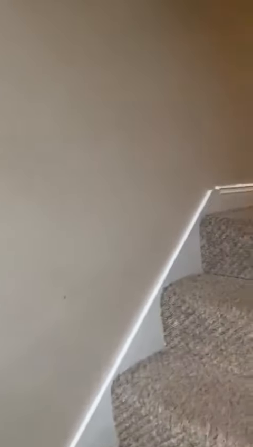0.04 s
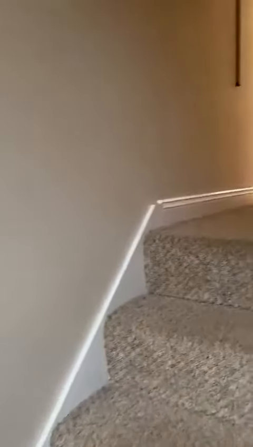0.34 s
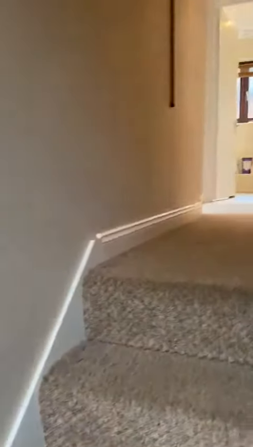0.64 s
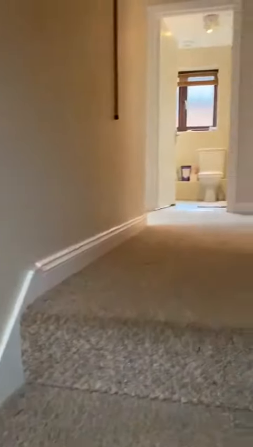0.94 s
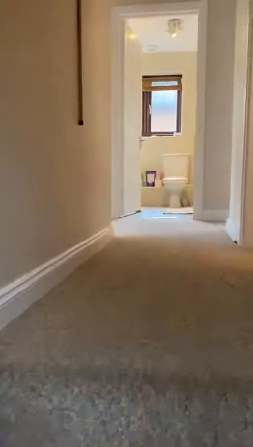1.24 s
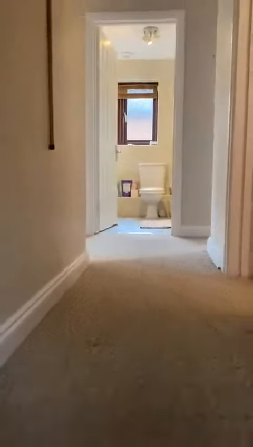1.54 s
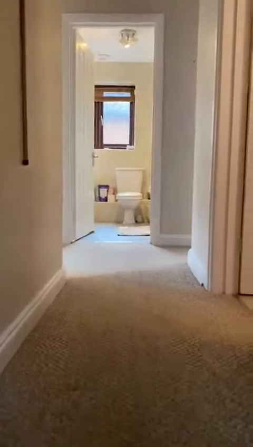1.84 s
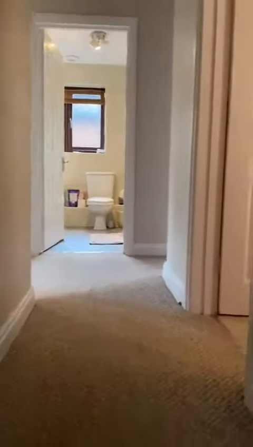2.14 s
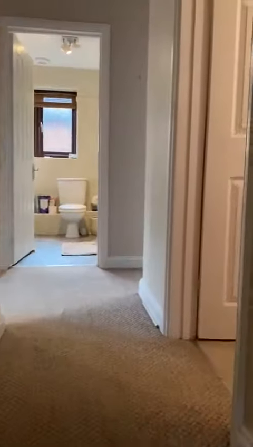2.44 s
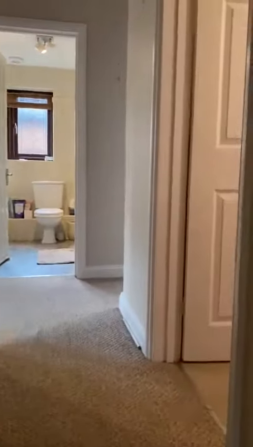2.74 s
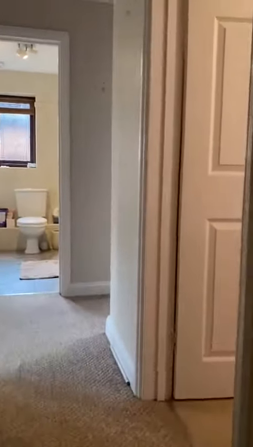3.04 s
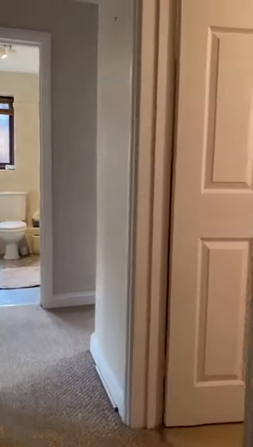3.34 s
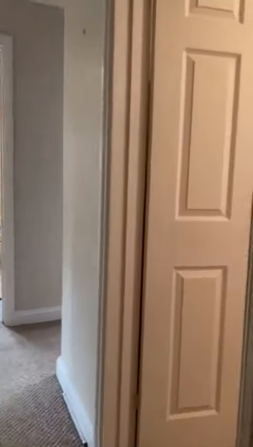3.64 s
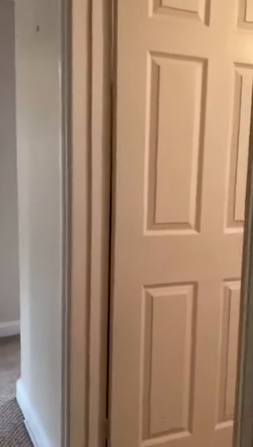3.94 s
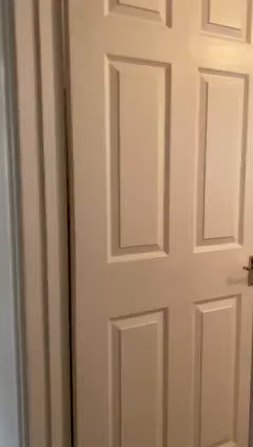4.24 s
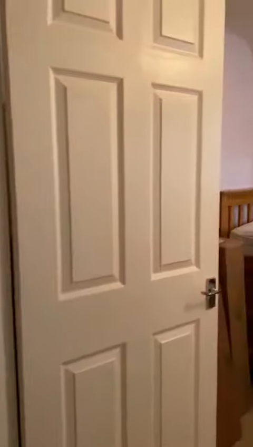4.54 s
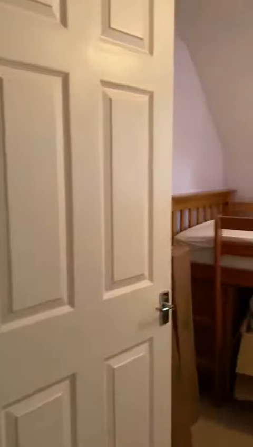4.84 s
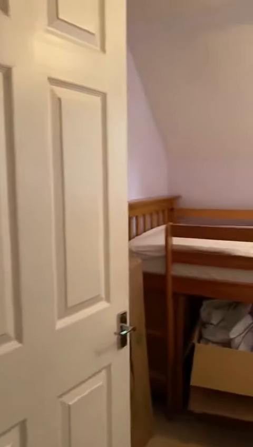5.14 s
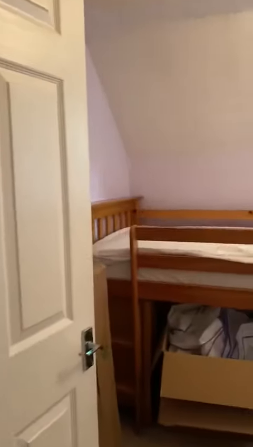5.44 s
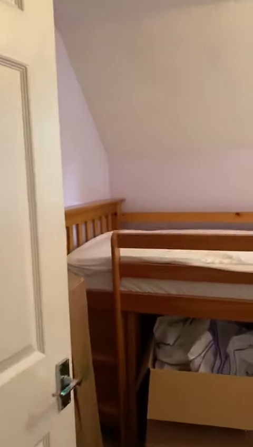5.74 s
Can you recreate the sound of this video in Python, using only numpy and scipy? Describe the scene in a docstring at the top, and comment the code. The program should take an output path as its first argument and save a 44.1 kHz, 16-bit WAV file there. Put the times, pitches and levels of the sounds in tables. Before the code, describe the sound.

Footsteps climb the last carpeted stairs and cross a landing in a quiet house. The steps land as deep, soft thuds, with floorboards knocking and clicking, and one loud wooden clack comes late on. Feet scuff the carpet and clothes brush faintly. Behind them a low electric hum swells and fades, all heard from a phone in the walker's hand.

```python
"""Footsteps climb the last carpeted stairs and cross a landing in a quiet house.
Each step thuds in the beams under the floor and boards knock, among sharp clicks and one loud clack.
Feet scuff the carpet and clothes brush, all heard from a phone in the walker's hand.
Behind them an electric hum swells and fades as the walker passes its loud and quiet spots."""
import sys
import numpy as np
from scipy import signal
from scipy.fft import rfft, irfft, next_fast_len
from scipy.io import wavfile
from scipy.ndimage import uniform_filter1d, map_coordinates

SR = 44100
rng = np.random.default_rng(int(sys.argv[2]) if len(sys.argv) > 2 else 0)


def master(y):
    """Save y as 16-bit WAV."""
    cut = np.clip(np.atleast_2d(y).T, -1, 1)
    pcm = np.round(cut * 32767)  # scale
    wavfile.write(sys.argv[1], SR, pcm.astype(np.int16))


N = 260631


def thuds():
    """Each footfall sets the beams under the floor swinging for a few cycles."""
    # Each row: start in seconds, level in dB, fade time in seconds (the time to drop by 60 dB).
    footfalls = [(0.311, -29.5, 0.19), (0.44, -34, 0.16), (1.136, -34, 0.46), (1.98, -40.5, 0.14),
                 (2.698, -38.5, 0.28), (2.941, -39.5, 0.17), (3.384, -33, 0.65), (4.035, -32.5, 0.32),
                 (4.198, -36.5, 0.15), (5.212, -36, 0.18)]
    # The beams' deep notes. Each row: pitch in Hz, relative level in dB.
    beam_notes = [(44, -19.5), (57, 6.5), (68, 11), (86, -5.5)]
    out, t = np.zeros(N), np.arange(SR // 2) / SR
    for start, db, fade in footfalls:
        swing = np.zeros(len(t))
        for hz, note_db in beam_notes:
            strength = amp(note_db + rng.normal(0, 0.24))
            swing += strength * np.sin(2 * np.pi * hz * (1 + rng.normal(0, 0.039)) * t)
        shape = amp(-60 * t / fade) * (1 - np.exp(-t / 0.1))
        add(out, start, amp(db) * strike(swing * shape, over=0.0046))
    return out


def knocks():
    """A board hits its beam, chatters and rings at two notes, then settles with a duller blow."""
    # Each row: start in seconds, level in dB, treble limit of the chatter in Hz, main note in Hz,
    # second note in Hz, fade time of the notes in seconds.
    blows = [(0.052, -53, 263, 160, 256.5, .15), (0.4277, -45, 1620, 478, 643, 0.092),
             (.876, -56.5, 354, 301, 244, 0.055), (1.205, -51, 900, 485, 601, .06),
             (1.990, -45, 847, 500, 636, .075), (2.524, -45.5, 704, 386, 618, 0.067),
             (2.719, -54.5, 1420, 308, 239, 0.069), (2.878, -54, 1250, 429, 623, .06),
             (3.000, -58.5, 770, 635, 520, 0.036), (3.026, -58.5, 700, 478, 169, .05),
             (3.37, -56, 773, 604, 440, 0.045), (3.401, -44.5, 560, 230.4, 174, .07),
             (3.956, -45.5, 900, 524, 288, 0.054), (4.019, -48, 196, 152.5, 268, 0.053),
             (4.128, -51, 448, 299, 438, .05), (4.176, -54.5, 850, 776, 516, .05),
             (4.213, -44, 1410, 457, 560, 0.062), (4.221, -45, 439, 303, 190, 0.049),
             (5.192, -46.5, 1200, 408, 521, 0.081), (5.347, -56.5, 320, 284, 219, 0.075),
             (5.641, -54.5, 830, 646, 808, 0.074)]
    # Where the whole floor rings. Each row: pitch in Hz, width in Hz, relative level in dB.
    floor_rings = [(148.4, 53, -1), (278, 55, -1), (367, 130, -4.5), (450, 120, -1), (708, 210, -2.5),
                   (964, 940, -4), (1540, 1730, -7)]
    out, t = np.zeros(N), np.arange(SR // 3) / SR
    chatter_fade_s, settle_delay_s, settle_db, settle_pitch = 0.15, 0.024, -7, 0.4675

    def floor(f):
        return sum((-1) ** k * amp(db) * resonance(f, hz, width)
                   for k, (hz, width, db) in enumerate(floor_rings))

    def note(hz, fade):
        return np.sin(2 * np.pi * hz * t) * amp(-60 * t / fade) * (1 - np.exp(-t / 0.002))

    settles = [(start + settle_delay_s, db + settle_db, *(settle_pitch * np.array(pitches)), fade)
               for start, db, *pitches, fade in blows]
    for start, db, top_hz, main_hz, second_hz, fade in list(blows) + settles:
        force = rng.standard_normal(len(t)) * amp(-60 * t / chatter_fade_s)
        force[0] += 27  # the first hard contact
        chatter = unit(soften(filtered(force, floor), top_hz, order=3))
        notes = unit(note(main_hz, fade) + amp(-4) * note(second_hz, fade))
        add(out, start, amp(db) * strike(chatter + amp(-0.5) * notes, over=0.013))
    return out


def clicks():
    """Sharp clicks: creaking boards, a loud wooden clack and faint handling ticks."""
    # Each row: start in seconds, level in dB, treble limit in Hz, ringing pitch in Hz, room share in dB.
    sharp_clicks = [(0.062, -59.5, 8400, 3980, -2), (0.4236, -48.5, 4730, 2680, -7.5),
                    (0.443, -58, 4600, 3800, 0.5), (.630, -55.5, 5400, 3120, -6.5),
                    (1.2025, -51, 6600, 2500, -3), (1.208, -52.5, 8100, 6200, -2.5),
                    (1.9877, -51, 4000, 2150, -0.5), (2.7149, -49.5, 3670, 2300, -5),
                    (2.868, -53.5, 8500, 5940, -1.5), (2.8752, -48, 8200, 5600, -3.5),
                    (3.3661, -51.5, 3770, 3000, 0), (4.2090, -42, 7000, 3600, -7),
                    (4.2110, -35, 7400, 5740, -4.5), (4.2190, -41, 5430, 1440, -2.5),
                    (4.2251, -45, 7300, 5960, -10), (4.356, -59.5, 9720, 6440, -5),
                    (5.732, -56.5, 4260, 2610, -3.5)]
    # The tone of a click. Each row: frequency in Hz, relative level in dB.
    snap_tone = [(500, -13.5), (900, -3.5), (1400, 1.5), (2600, 2.5), (4000, -0.5), (5800, 3), (8000, -2),
                 (11000, -0.5)]
    direct, to_room, t = np.zeros(N), np.zeros(N), np.arange(SR // 5) / SR
    burst_gap_s, burst_fade_s, burst_loss_db = 0.0034, 0.006, 6
    bursts = np.zeros(len(t))
    for k in range(3):
        add(bursts, k * burst_gap_s, amp(-k * burst_loss_db - 60 * t / burst_fade_s))

    def body(f):
        delay_s = 0.004  # at 1000 Hz; higher sounds arrive sooner
        return amp(along(snap_tone, f)) * np.exp(-4j * np.pi * delay_s * np.sqrt(1000 * f))

    for start, db, top_hz, ring_hz, room_db in sharp_clicks:
        force = rng.standard_normal(len(t)) * bursts / np.linalg.norm(bursts)
        force[0] += amp(-3.5)  # the sharp first crack
        snap = filtered(force, lambda f: body(f) * (1 + 1.5 * resonance(f, ring_hz, width=470)))
        snap = amp(db) * strike(soften(snap, top_hz, order=4), over=0.0039)
        add(direct, start, snap)
        add(to_room, start, amp(room_db) * snap)
    return direct, to_room


def scuffs():
    """A foot slides on the carpet; each scuff hisses at its own pitch."""
    # Each row: loudest moment in seconds, level in dB, fade time in seconds, pitch of the hiss in Hz.
    slides = [(0.295, -64, 0.24, 3980), (.3, -66, 0.29, 985), (1.662, -73, 0.43, 3540),
              (2.657, -72.5, 0.13, 4360), (2.884, -58, 0.26, 6270), (4.021, -57.5, 0.16, 2220),
              (4.055, -66, 0.25, 6270), (4.79, -64, 0.23, 2040), (4.82, -63.5, 0.26, 4480),
              (4.96, -71, .4, 6900), (5.035, -64.5, 0.21, 2700), (5.406, -65.5, 0.19, 2400),
              (5.6, -68.5, 0.32, 5170)]
    out = np.zeros(N)
    for peak, db, fade, hz in slides:
        t = np.arange(N) / SR - peak
        rise = np.exp(-(np.minimum(t, 0) / (0.093 * fade)) ** 2)
        fall = amp(-60 * np.maximum(t, 0) / fade)
        hiss = unit(filtered(fibres(), lambda f: resonance(f, hz, width=3700) ** 2))
        out += amp(db) * rise * fall * hiss
    return out


def clothes():
    """Fabric brushes with each stride and rests in between; its folds catch unevenly."""
    # The tone of the cloth. Each row: frequency in Hz, relative level in dB.
    cloth_tone = [(250, -4.5), (600, 12.5), (1000, 3.5), (2200, 4), (4000, 5.5), (6500, 1.5), (9000, -13),
                  (11000, -27.5)]
    # How hard it rubs, most in the turn through the doorway. Each row: time in seconds, level in dB.
    effort = [(0, -74.5), (1.0, -76.5), (2.3, -74), (3.0, -70.5), (3.65, -71.5), (4.1, -65), (4.5, -71),
              (4.95, -68), (5.55, -67), (5.91, -74)]
    # The legs hang still. Each row: time in seconds, dip in dB, half the dip's width in seconds.
    rests = [(.9, 6, 0.13), (1.5, 5, 0.083), (2.52, 9, 0.094), (2.799, 8.5, 0.042), (3.22, 9.5, 0.11),
             (4.17, 4.5, 0.071), (5.28, 12.5, 0.14)]
    rub = unit(filtered(fibres(), lambda f: amp(along(cloth_tone, f))))
    effort_db = np.interp(np.arange(N) / SR, *np.transpose(effort))
    folds_db = 1.5 * wobble(25)
    rest_db = sum(dip_db * bell(time, width) for time, dip_db, width in rests)
    return amp(effort_db - rest_db + folds_db) * rub


def fibres():
    """Many rubbing fibres catch and let go, while tiny creases flick over."""
    creases_per_s, crease_db, grain_db = 130, -4.5, 4.5
    catches = rng.standard_normal(N) * amp(grain_db * wobble(350))
    creases = unit((rng.random(N) < creases_per_s / SR) * rng.uniform(-1, 1, N))
    return unit(unit(patchy(catches, depth_db=2.4)) + amp(crease_db) * creases)


def patchy(x, depth_db):
    """The tone of rubbing shifts from moment to moment as the contact moves."""
    spectrum = signal.stft(x, nperseg=512)[2]
    patches = uniform_filter1d(rng.standard_normal(spectrum.shape), size=6, axis=0)  # blur over pitch
    patches = uniform_filter1d(patches, size=9, axis=1)  # blur over time
    return signal.istft(spectrum * amp(depth_db * unit(patches)), nperseg=512)[1][:N]


def mains_hum():
    """An electric hum forms a standing wave: loud mid-landing, nearly silent at each end."""
    first_quiet_s, last_quiet_s = 0.74, 4.69
    landing_db, quiet_db = -40, -55
    stairs_drop_db, bedroom_drop_db = 13.5, 7.5  # weaker swells before and after the landing
    across = (np.arange(N) / SR - first_quiet_s) / (last_quiet_s - first_quiet_s)
    swell_db = landing_db - stairs_drop_db * (across < 0) - bedroom_drop_db * (across > 1)
    level = np.hypot(amp(swell_db) * np.sin(np.pi * across), amp(quiet_db))
    return level * tone(100, drift=0.08)


def motor():
    """A motor drones low, loudest as the walker passes the bedroom door."""
    return amp(-56) * bell(time=4.67, width=1.55) * tone(75.8, drift=0.051)


def appliances():
    """Running appliances whine faintly; each pitch has its own loud spots in the house."""
    # Each row: pitch in Hz, level in dB, when the spot is passed in seconds, half its width in seconds.
    spots = [(152.4, -69, 3, 4), (152.4, -67, 3.7, .7), (200, -66, 1.9, .9), (217.4, -66, 1.6, 1.3),
             (435, -74, .8, .5), (435, -73, 3.8, .7), (435, -67.5, 5.4, .8), (652, -79, 1.2, 1.5),
             (1304.5, -83.5, 1.3, .9), (1956.3, -83.5, 1.7, 1.5), (1956.3, -78.5, 3.14, .11)]
    out = np.zeros((2, N))
    for pitch in sorted({row[0] for row in spots}):
        level = sum(amp(db) * bell(time, width) for hz, db, time, width in spots if hz == pitch)
        level *= amp(1.2 * wobble(2.2))
        centre = tone(pitch, drift=0.81)
        sides = np.array([tone(pitch, drift=1.2), tone(pitch, drift=1.6)])
        out += level * (centre + 0.28 * sides)
    return out


def air():
    """The still house makes a soft, low rush from all around."""
    # Each row: frequency in Hz, relative level in dB.
    air_tone = [(25, -12.5), (58, 4.5), (120, -4), (200, -10.5), (320, -9.5), (500, -17), (680, -13.5),
                (1000, -26.5), (1500, -29), (2100, -25.5), (3200, -36), (4500, -47.5), (7000, -63),
                (11000, -59)]
    noise = filtered(rng.standard_normal((2, N)), lambda f: amp(along(air_tone, f)))
    return amp(-57 + 0.7 * wobble(4)) * unit(diffuse(noise))


def in_room(direct, to_room, lead_ms):
    """Direct sound plus the landing's short echo, which changes as the walker moves."""
    # Each row: frequency in Hz, the echo's fade time in seconds.
    fades = [(80, 0.53), (300, 0.34), (2000, 0.26), (5000, 0.11), (11000, 0.12)]
    echoes, hop = np.zeros((2, N + SR)), SR // 3
    for start in range(0, N, hop):
        hz, t, spectrum = signal.stft(rng.standard_normal((2, SR // 2)), SR, nperseg=256)
        shape = amp(-60 * t / along(fades, hz)[:, None]) * (1 - np.exp(-t / 0.00078))
        tail = signal.istft(spectrum * shape, SR, nperseg=256)[1]
        tail /= np.linalg.norm(tail[0])
        echo = signal.fftconvolve(to_room[None, start:start + hop], tail, axes=1)
        echoes[:, start:start + echo.shape[1]] += echo
    return from_below(direct, lead_ms) + diffuse(echoes[:, :N])


def from_below(x, lead_ms):
    """Sound from the floor reaches the phone's left microphone first."""
    return filtered(x, lambda f: np.exp(1j * np.pi * f * lead_ms / 1000 * np.array([[1], [-1]])))


def diffuse(pair):
    """Sound from all around: left and right are alike in the bass, different in the treble."""
    # Each row: frequency in Hz, likeness from 0 (unrelated) to 1 (the same).
    likeness = [(100, 0.97), (250, 1), (500, 0), (1000, 0), (2500, 0.013), (9000, 0.043)]
    angle = lambda f: np.arccos(np.clip(along(likeness, f), -1, 1)) / 2
    mid, side = filtered(pair, lambda f: np.array([np.cos(angle(f)), np.sin(angle(f))]))
    return np.array([mid + side, mid - side])


def amp(db):
    """Turn decibels into a factor to multiply by."""
    return 10 ** (np.asarray(db) / 20)


def unit(x):
    """Scale a sound to an average (rms) level of 1."""
    return x / np.sqrt(np.mean(x ** 2) + 1e-20)


def strike(x, over):
    """Give a hit the energy of level 1 held for `over` seconds."""
    return x / np.sqrt(np.sum(x ** 2) / (over * SR))


def add(track, start, x):
    """Mix x into the track from `start` seconds on."""
    part = track[max(round(start * SR), 0):][:len(x)]
    part += x[:len(part)]


def along(points, hz):
    """Read smoothly between rows of frequency and value, on a musical (log) scale."""
    freqs, values = np.transpose(points)
    return np.interp(np.log(hz + 1), np.log(freqs + 1), values)


def bell(time, width):
    """A smooth rise to 1 and fall around `time` seconds."""
    return np.exp(-((np.arange(N) / SR - time) / width) ** 2)


def wobble(rate):
    """A smooth curve through `rate` random values a second."""
    return map_coordinates(rng.standard_normal(int(N * rate / SR) + 4), [np.arange(N) * rate / SR])


def tone(hz, drift):
    """A pure tone whose phase wanders by about `drift` radians."""
    return np.sqrt(2) * np.sin(2 * np.pi * hz * np.arange(N) / SR + drift * wobble(1.845))


def filtered(x, response):
    """Scale and delay each frequency of x as `response` says."""
    length = x.shape[-1]
    padded = next_fast_len(length + SR // 2)
    return irfft(rfft(x, padded) * response(np.fft.rfftfreq(padded, 1 / SR)), padded)[..., :length]


def resonance(f, hz, width):
    """The response of something that rings at hz: a peak of height 1."""
    return 1j * f * width / (hz * hz - f * f + 1j * f * width)


def soften(x, hz, order):
    """A soft contact makes little sound above hz."""
    return signal.sosfilt(signal.butter(order, min(hz, 0.45 * SR), fs=SR, output="sos"), x)


def scene():
    """Floor and clothes sound from below the phone, amid the hum and air of the house."""
    wood = knocks()
    cloth = soften(clothes() + scuffs(), hz=9360, order=8)
    boards = in_room(wood, amp(-2.5) * wood, lead_ms=0.18) * amp([[1], [-1]])  # louder on the left
    clicking = in_room(*clicks(), lead_ms=0.093)
    brushing = in_room(amp(0.5) * cloth, amp(1.43) * cloth, lead_ms=0.094)
    return thuds() + boards + clicking + brushing + mains_hum() + motor() + appliances() + air()


def record(dry):
    """The phone reshapes the stereo width and drops the deepest bass and highest treble."""
    # Each row: frequency in Hz, gain in dB on the difference between left and right.
    widening = [(700, -1), (1200, 4), (1750, -5.5), (2500, 3.5), (5000, 1.5), (5600, -3), (6200, -22.5),
                (7200, -11.5), (8300, 4.5), (11000, 17.5)]
    mid = (dry[0] + dry[1]) / 2
    side = filtered((dry[0] - dry[1]) / 2, lambda f: amp(along(widening, f)))
    bottom_hz, top_hz = 36, 11050
    bass_cut = lambda f: (f / bottom_hz) ** 2 / np.sqrt(1 + (f / bottom_hz) ** 4)
    top_cut = lambda f: 1 / np.sqrt(1 + (f / top_hz) ** 120)
    return filtered(np.array([mid + side, mid - side]), lambda f: bass_cut(f) * top_cut(f))


dry = scene()
out = record(dry)
master(out)
```